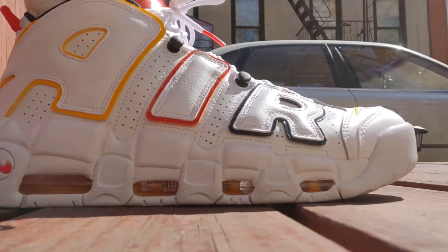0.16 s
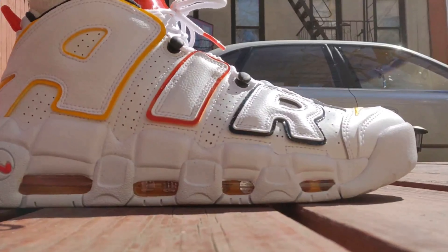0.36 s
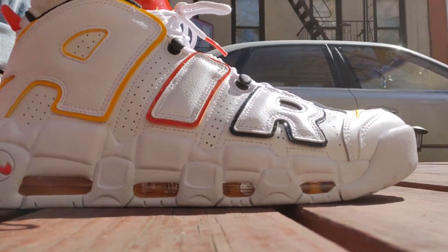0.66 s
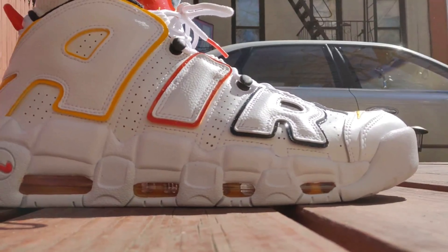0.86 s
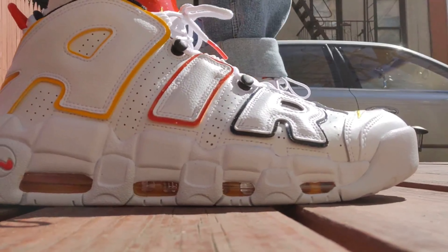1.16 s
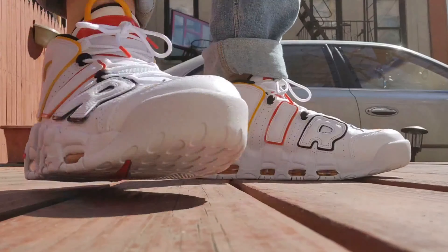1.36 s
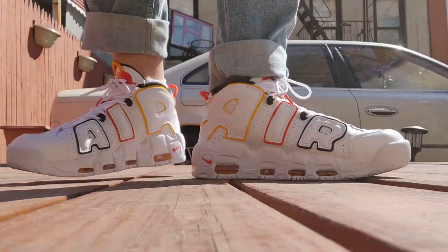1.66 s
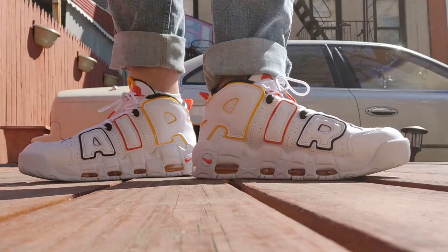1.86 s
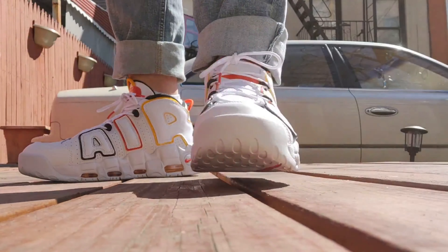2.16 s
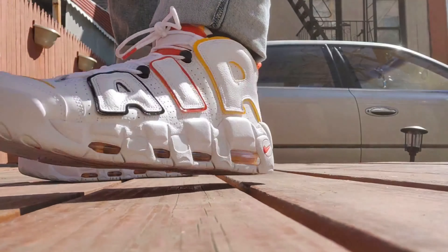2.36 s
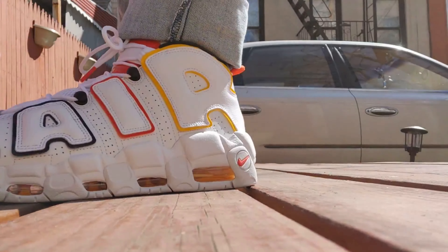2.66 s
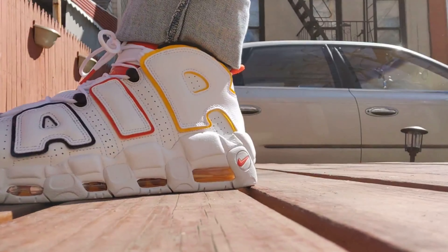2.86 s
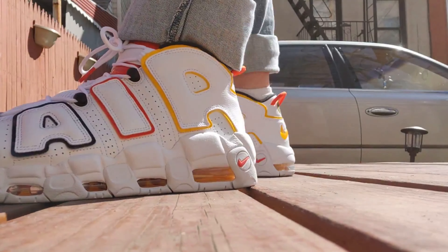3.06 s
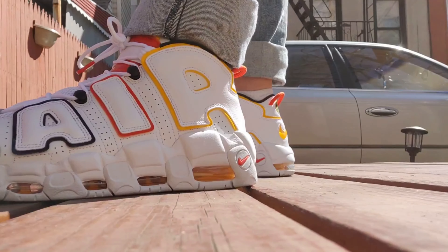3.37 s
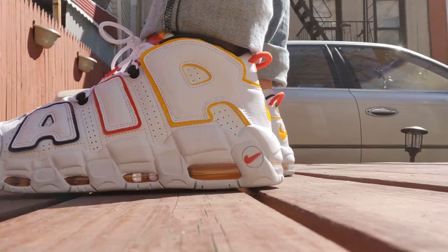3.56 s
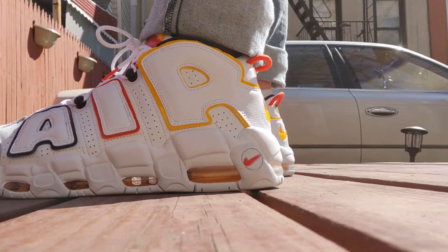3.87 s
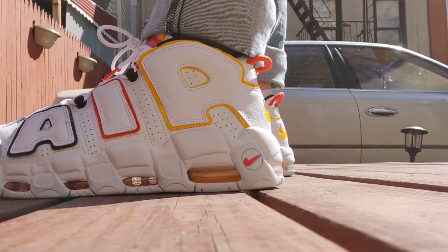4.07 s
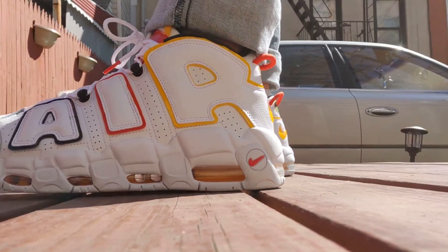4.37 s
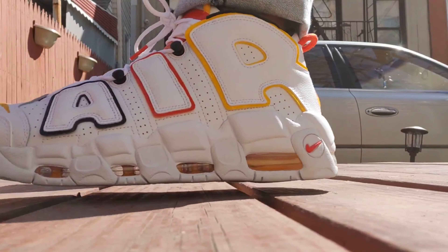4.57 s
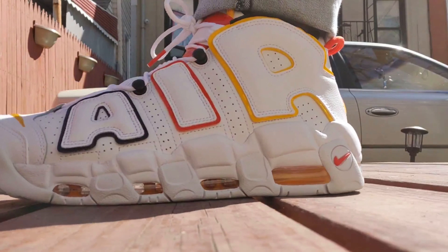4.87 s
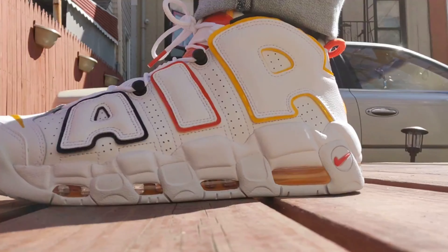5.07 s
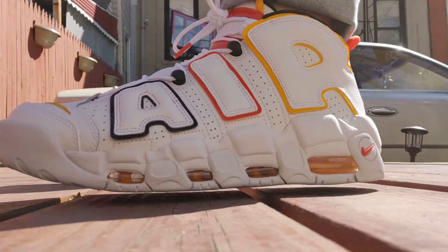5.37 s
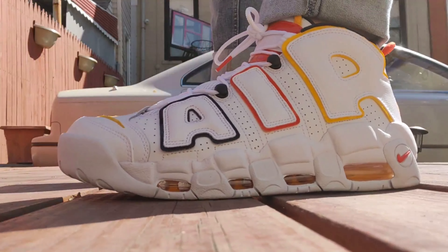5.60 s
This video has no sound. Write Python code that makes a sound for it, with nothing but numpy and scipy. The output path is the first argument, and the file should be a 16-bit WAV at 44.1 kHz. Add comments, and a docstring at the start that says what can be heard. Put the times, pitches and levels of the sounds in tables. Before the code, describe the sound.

Sneakers step and shuffle on a gritty wooden deck outdoors, very close to the microphone. The first half second is the loudest: a quick cluster of low, hollow thumps with a sharp scuff. Softer bumps and a few small creaks follow around 1 second. A step lands at 1.5 seconds, then the sole drags in a hissing, stuttering scrape and thuds at 1.8. Firm knocks come at about 2.1 seconds, followed by a faint rubber squeak. Single steps fall near 3 and 3.5 seconds, with tiny cracks of grit. Another stuttering scrape comes at about 3.9 seconds, ending in a crisp tick. After a quieter stretch with one faint scuff, a few soft thuds land around 5.4 seconds. Underneath are a low wind rumble, strongest at the start, light cloth rustle and a faint, distant street hum.

```python
"""Sneakers thud, drag and stutter on a gritty wooden deck, right beside a small microphone outdoors.
Each sole pushes the boards' low modes and its edge knocks; sliding tread hisses over the grit and rings.
Grains crack, shoe or board creaks, rubber squeaks faintly, and fence and walls return a short tail.
Underneath, wind and shaken boards rumble, cloth and shoe rustle, and the street hums far off."""
import sys
import numpy as np
from scipy import signal
from scipy.fft import rfft, irfft, next_fast_len
from scipy.io import wavfile
from scipy.ndimage import uniform_filter1d, map_coordinates

SR = 44100
rng = np.random.default_rng(int(sys.argv[2]) if len(sys.argv) > 2 else 0)


def store_wav(level_fs):
    """Save 16-bit WAV to argv[1]."""
    pcm = np.round(np.clip(np.atleast_2d(level_fs), -1, 1) * 32767)
    wavfile.write(sys.argv[1], SR, pcm.T.astype(np.int16))


N = 252907
TIME_S = np.arange(N) / SR


def amp(db):
    return 10 ** (np.asarray(db) / 20)


def unit_rms(x):
    return x / np.sqrt(np.mean(x ** 2) + 1e-20)


def envelope(rows):
    """Gain per sample from (s, dB) rows."""
    return amp(np.interp(TIME_S, *np.transpose(rows)))


def wobble(rate_hz):
    """Smooth random curve, rate_hz knots a second."""
    return map_coordinates(rng.standard_normal(int(N * rate_hz / SR) + 4), [TIME_S * rate_hz])


def filtered(x, response):
    """x through a gain given as a function of Hz."""
    size = next_fast_len(len(x) + 8192)
    return irfft(rfft(x, size) * response(np.fft.rfftfreq(size, 1 / SR)), size)[:len(x)]


def coloured(x, spectrum):
    """x shaped by (Hz, dB) rows on a log axis, rms 1."""
    hz, db = np.transpose(spectrum)
    return unit_rms(filtered(x, lambda f: amp(np.interp(np.log(f + 1), np.log(hz + 1), db))))


def add(out, start_s, sound):
    part = out[max(round(start_s * SR), 0):][:len(sound)]
    part += sound[:len(part)]


# Each row: time in seconds, street level in dB.
STREET_LEVELS = [(0, -52), (0.2, -50), (0.6, -54.5), (1.42, -53.5), (1.6, -44), (2.05, -53.5),
                 (2.25, -51.5), (2.85, -56.5), (3.05, -52), (3.6, -53.5), (4.5, -58.5), (4.78, -53.5),
                 (5, -57.5), (5.73, -53.5)]
# Each row: frequency in Hz, relative density in dB.
STREET_SPECTRUM = [(88, -35), (150, -17), (201, -11), (240, -4.5), (406, -17.5), (504, -16), (624, -22),
                   (790, -18), (1530, -35.5), (5570, -54.5), (7770, -47.5), (16000, -52.5)]


def street():
    """Far street: a smooth hum of noise."""
    return envelope(STREET_LEVELS) * amp(wobble(22)) * coloured(rng.standard_normal(N), STREET_SPECTRUM)


# Each row: time in seconds, rumble level in dB.
RUMBLE_LEVELS = [(0, -18), (0.08, -26), (0.27, -34.5), (0.5, -35), (0.6, -42), (0.7, -35), (0.82, -40),
                 (1.08, -39.5), (1.2, -36), (1.34, -41.5), (1.42, -53), (1.7, -44), (2.05, -52), (2.5, -49),
                 (2.75, -58.5), (2.88, -49.5), (3.25, -48.5), (3.55, -44.5), (3.75, -58.5), (3.9, -39.5),
                 (4.05, -55), (4.6, -61), (5.1, -58), (5.4, -49), (5.55, -50.5), (5.73, -49.5)]
# Each row: frequency in Hz, relative density in dB.
RUMBLE_SPECTRUM = [(13, -51), (22, -21.5), (37, -12.5), (76, 1.5), (171, 2), (281, -9), (318, -17.5),
                   (523, -27.5), (670, -39.5), (900, -42), (1170, -63.5), (1980, -120)]


def rumble():
    """Wind and shaken boards: lumpy low noise."""
    lumps = amp(2.3 * np.tanh(wobble(22)) + 1.5 * wobble(5.4))
    return envelope(RUMBLE_LEVELS) * unit_rms(lumps * coloured(rng.standard_normal(N), RUMBLE_SPECTRUM))


# Each row: time in seconds, rustle level in dB.
RUSTLE_LEVELS = [(0, -54.5), (0.3, -65.5), (0.45, -62), (0.6, -67.5), (1.05, -65), (1.2, -62),
                 (1.42, -65.5), (1.6, -57), (1.8, -59), (2.05, -62.5), (2.25, -58.5), (2.85, -73),
                 (3.05, -64.5), (3.3, -74), (3.42, -72), (3.55, -63.5), (3.72, -69), (4.03, -65.5),
                 (4.15, -78.5), (4.3, -87.5), (5.1, -81.5), (5.24, -69), (5.5, -82), (5.73, -63)]
# Each row: frequency in Hz, relative density in dB. Also colours the grit cracks.
RUSTLE_SPECTRUM = [(600, -65.5), (1200, -13), (2270, -6), (2760, -17.5), (4360, -16), (5470, -26.5),
                   (7490, -3.5), (8350, 0.5), (9930, -12.5), (15200, -18), (16000, -16.5)]


def rustle():
    """Cloth and shoe: bright, fluttering noise."""
    flutter = amp(2 * wobble(7.6) + 1.5 * wobble(140))
    return envelope(RUSTLE_LEVELS) * unit_rms(flutter * coloured(rng.standard_normal(N), RUSTLE_SPECTRUM))


def yard_echo(x, t60_s=0.11, cutoff_hz=2500):
    """Fence and walls send back a short dull tail."""
    t = np.arange(SR // 4) / SR
    tail = filtered(rng.standard_normal(len(t)), lambda f: 1 / (1 + (f / cutoff_hz) ** 2))
    tail *= amp(-60 * t / t60_s)
    return signal.fftconvolve(np.pad(x, (200, 0)), tail / np.linalg.norm(tail))[:N]


# Each row: start and end in seconds, level in dB, start and end pitch in Hz, overtone multiple,
# overtone level in relative dB.
SOLE_SQUEAKS = [(2.26, 2.37, -50.5, 550, 490, 2, -16), (2.408, 2.443, -62, 2230, 2120, 3, -12)]


def squeaks():
    """The sole sticks and slips: ragged tones that sag in pitch."""
    out = np.zeros(N)
    for start_s, end_s, db, start_hz, end_hz, multiple, overtone_db in SOLE_SQUEAKS:
        size = round((end_s - start_s) * SR)
        hz = np.linspace(start_hz, end_hz, size) * (1 + 0.07 * wobble(250)[:size])
        phase = 2 * np.pi * np.cumsum(hz) / SR
        tone = np.sin(phase) + amp(overtone_db) * np.sin(multiple * phase)
        add(out, start_s, amp(db + 4 * wobble(85)[:size]) * np.hanning(size) ** 0.5 * tone)
    return out


# Each row: start in seconds, level in dB.
GRIT_CRACKS = [(1.773, -40), (2.824, -47.5), (2.9408, -50), (3.0006, -42), (3.025, -46.5), (3.0374, -53),
               (3.0777, -49.5), (3.1283, -46), (4.0503, -34.5), (4.069, -44), (5.2736, -37)]


def grit_cracks(rise_s=0.00028, t60_s=0.011):
    """Single grains crack in short bright bursts."""
    out, t = np.zeros(N), np.arange(SR // 30) / SR
    for start_s, db in GRIT_CRACKS:
        burst = coloured(np.diff(rng.standard_normal(len(t) + 2), 2), RUSTLE_SPECTRUM)
        add(out, start_s, amp(db - 60 * t / t60_s) * (1 - np.exp(-t / rise_s)) * burst)
    return out


# Each row: start in seconds, level in dB.
CREAK_PULSES = [(0.089, -50), (0.939, -38.5), (1.02, -32), (1.586, -32), (2.903, -46), (4.003, -40.5)]
# Creaks as weight rolls onto one foot: start and end in seconds, pulse count, mean and scatter in dB.
WEIGHT_ROLL = (.8, .98, 11, -45, 3)


def creaks(pitch_hz=1070, rise_s=0.0006, t60_s=0.0125):
    """Shoe or board under load gives dull, damped pulses."""
    out, t = np.zeros(N), np.arange(SR // 30) / SR
    from_s, to_s, count, mean_db, scatter_db = WEIGHT_ROLL
    run = [(rng.uniform(from_s, to_s), rng.normal(mean_db, scatter_db)) for _ in range(count)]
    for start_s, db in CREAK_PULSES + run:
        tone = np.sin(2 * np.pi * pitch_hz * rng.normal(1, 0.058) * t)
        add(out, start_s, -amp(db - 60 * t / t60_s) * (1 - np.exp(-t / rise_s)) * tone)
    return out


# Each row: frequency in Hz, relative density of the grit hiss in dB.
HISS_SPECTRUM = [(1530, -45.5), (2600, -16.5), (2940, -28), (3770, -17), (5440, -22.5), (6470, -12),
                 (7200, -12), (7420, -8), (8320, 1), (8780, 0), (9760, -9), (11600, -16.5), (15200, -15.5),
                 (16000, -18.5)]


def rubbing(size, rubber_db, rubber_hz, grain_db):
    """Uneven grains drive a hiss, a broad scrape and the tread blocks' resonance."""
    def tread(f):
        width_hz = 0.11 * rubber_hz
        scrape = 0.076 / (1 + (700 / (f + 1)) ** 4)
        resonance = np.abs(f * width_hz / (rubber_hz ** 2 - f * f + 1j * f * width_hz))
        return (scrape + resonance) / (1 + (f / 2700) ** 6)

    grains = amp(grain_db * unit_rms(uniform_filter1d(rng.standard_normal(size), size=40)))
    hiss = coloured(grains * rng.standard_normal(size), HISS_SPECTRUM)
    rubber = unit_rms(filtered(grains * rng.standard_normal(size), tread))
    return hiss + amp(rubber_db) * rubber


# Each row: start, swell and fade in seconds, hiss in dB, rubber over hiss in dB, rubber pitch in Hz.
SOLE_DRAGS = [(0.142, 0.044, 0.11, -49.5, -17.5, 1640), (1.487, 0.027, 0.073, -55.5, -4.5, 2070),
              (1.61, 0.042, 0.035, -36, -7, 2020), (1.7, 0.008, .03, -32.5, -19.5, 2115),
              (2.124, 0.017, 0.029, -43.5, -5, 1850), (3.142, 0.015, 0.051, -52, -1.5, 1060),
              (3.166, 0.031, .026, -52.5, 1.5, 1950), (3.813, 0.024, 0.045, -41, -11.5, 1520),
              (3.86, 0.044, 0.099, -51.5, -5, 1250), (4.705, 0.024, 0.13, -57.5, -12, 1530),
              (5.626, 0.071, 0.03, -57.5, -21, 1800)]


def drags(ramp_share=0.76):
    """A sole slides, swelling to its fastest, holding and fading out."""
    out = np.zeros(N)
    for start_s, swell_s, fade_s, db, rubber_db, hz in SOLE_DRAGS:
        t = np.arange(round((swell_s + fade_s) * SR)) / SR
        ramp = np.clip(np.minimum(t / swell_s, (t[-1] - t) / fade_s) / ramp_share, 0, 1)
        shape = np.sin(np.pi / 2 * ramp) ** 2
        add(out, start_s, amp(db) * shape * rubbing(len(t), rubber_db, hz, grain_db=-0.5))
    return out


# Each row: start in seconds, level in dB, rubber over hiss in dB, rubber pitch in Hz.
TREAD_SLIPS = [(0.1225, -16, -3.5, 1320), (0.133, -31, -11, 900), (0.148, -45.5, 14.5, 1070),
               (1.635, -31, -1.5, 1100), (1.666, -30, -18, 2030), (1.6973, -17, -9, 1920),
               (1.7105, -18, -3, 2060), (1.716, -18.5, -8, 2050), (2.131, -37, 1, 2010),
               (2.139, -44, -8, 800), (2.959, -46.5, 9, 1134), (3.181, -52.5, 17, 900),
               (3.199, -60, 9, 1980), (3.8434, -29, -13, 1023), (3.866, -38.5, -2.5, 900),
               (3.882, -22, -7.5, 1900), (3.899, -21, -10.5, 1095), (3.933, -24, -10, 1360),
               (3.9536, -28.5, -4, 1046), (4.718, -50.5, -23, 1305), (4.728, -40, -11, 940),
               (4.744, -47, -6, 920)]


def slips(release_s=0.0023, slide_s=0.0036, grip_t60_s=0.025):
    """The tread lets go, slides a few ms and grips again."""
    out, t = np.zeros(N), np.arange(SR // 10) / SR
    shape = (1 - np.exp(-t / release_s)) * amp(-60 * np.maximum(t - slide_s, 0) / grip_t60_s)
    for start_s, db, rubber_db, hz in TREAD_SLIPS:
        add(out, start_s, amp(db) * shape * rubbing(len(t), rubber_db, hz, grain_db=1.5))
    return out


# Each row: multiple of the board pitch, base level in dB.
BOARD_MODES = [(0.998, -0.5), (1.502, -8.5), (2.201, -12), (2.899, -19)]
# Each row: mean frequency in Hz, base level in dB, T60 in seconds.
TREAD_EDGE_MODES = [(386.7, 6.5, 0.018), (478, 0, 0.03), (710, 8, 0.016), (1035, 6.5, 0.0085),
                    (1210, -21, 0.049), (1770, -0.5, 0.0054), (2048, -12, 0.024), (2600, -19, 0.0057)]
# Each row: time of the peak in seconds, level in dB, board pitch in Hz, hardness as relative knock in dB.
SOLE_THUDS = [(0.035, -22, 150, -41), (0.105, -11, 159.5, -43), (0.124, -2.5, 227, -15.5),
              (0.141, -10, 224, -40), (0.156, -3, 248, -18.5), (0.172, -10, 184, -32.5),
              (0.187, -10, 161, -39), (0.198, -15, 190, -34.5), (0.233, -16.5, 145, -53),
              (0.361, -4.5, 157, -28.5), (0.38, -13, 197, -33.5), (0.424, -15, 195, -50.5),
              (0.544, -22.5, 140, -31), (0.567, -26, 145, -26), (0.662, -26, 154, -41),
              (0.717, -25.5, 115, -36), (0.79, -27, 154, -35), (1.164, -22, 121, -34),
              (1.201, -19.5, 131, -29), (1.241, -24.5, 165, -44), (1.491, -21, 258, -12),
              (1.497, -26, 216, -18), (1.507, -13, 262, -23), (1.53, -16, 177, -27.5),
              (1.802, -21.5, 157.5, -37), (1.812, -14, 143.4, -58), (2.134, -12, 195, -15),
              (2.146, -10, 191, -9.5), (2.186, -12, 191, -24.5), (2.429, -39.5, 137, -14.5),
              (2.484, -36.5, 151, -45), (2.911, -40, 200, -15), (2.965, -15, 225.3, -23),
              (3.205, -30.5, 158, -11.5), (3.221, -34.5, 160, -24), (3.47, -21, 215, -18.5),
              (3.487, -31, 214, -16), (3.846, -33.5, 159, -12.5), (3.948, -27, 214, -28),
              (4.006, -30, 190, -20), (4.721, -48.5, 213, -14.5), (5.176, -42.5, 174, -11),
              (5.346, -23.5, 158.5, -26), (5.436, -23, 177, -44), (5.467, -22, 150, -40)]


def thuds(edge_gain_db=5.5, edge_rise_share=0.62):
    """A sole pushes the boards and its edge knocks; a soft landing is slower, duller and longer."""
    out, t = np.zeros(N), np.arange(SR // 4) / SR
    for peak_s, db, board_hz, knock_db in SOLE_THUDS:
        rise_s = np.clip(-0.0001 * knock_db - 0.0004, 0.0008, 0.0035)
        push = (1 - np.exp(-t / rise_s)) ** 2 * amp(-60 * t / (0.032 - 0.00054 * knock_db))
        tilt_db = 0.14 * knock_db + 1.5 - 290 * t  # upper modes die first
        board, edge = np.zeros((2, len(t)))
        for multiple, base_db in BOARD_MODES:
            mode_db = base_db + rng.normal(0, 0.93) + (multiple - 0.5) * tilt_db
            board -= amp(mode_db) * np.sin(2 * np.pi * multiple * board_hz * t)
        for hz, base_db, t60_s in TREAD_EDGE_MODES:
            mode_db = base_db + rng.normal(0, 0.57) + 0.23 * knock_db * np.log2(hz / 800)
            edge -= amp(mode_db - 60 * t / t60_s) * np.sin(2 * np.pi * hz * rng.normal(1, 0.083) * t)
        board *= push / push.max()
        edge *= (1 - np.exp(-t / (edge_rise_share * rise_s))) ** 2
        add(out, peak_s - np.abs(board).argmax() / SR, amp(db) * board)
        add(out, peak_s - 0.002, amp(db + knock_db + edge_gain_db) * edge)
    return filtered(out, lambda f: 1 / (1 + (75 / (f + 1)) ** 4))  # microphone low cut thins deep bass


def scene(echo_db=-21):
    """Feet and their echo over the background, mono."""
    feet = thuds() + slips() + grit_cracks() + creaks() + drags() + squeaks()
    return (feet + amp(echo_db) * yard_echo(feet) + rumble() + rustle() + street())[None]


def record(dry, ceiling=0.9, cutoff_hz=16000):
    """Soft clip on the loudest blows, then a steep low-pass."""
    clipped = dry[0] / (1 + np.abs(dry[0] / ceiling) ** 4) ** (1 / 4)
    return filtered(clipped, lambda f: 1 / (1 + (f / cutoff_hz) ** 120))[None]


dry = scene()
out = record(dry)
store_wav(out)
```